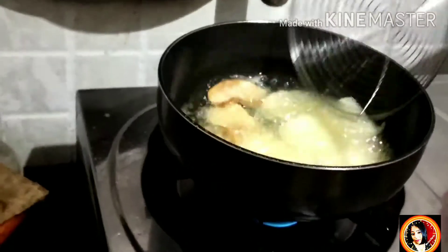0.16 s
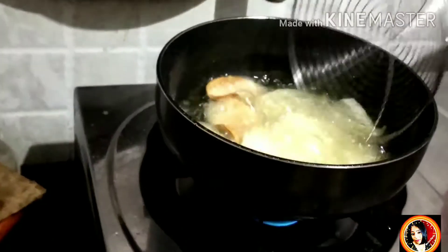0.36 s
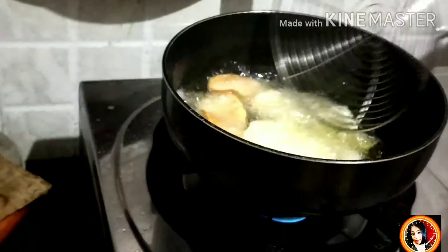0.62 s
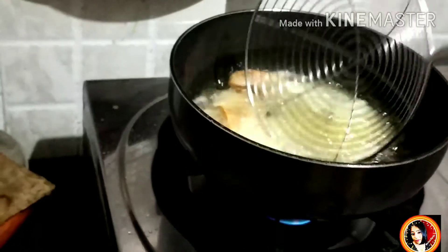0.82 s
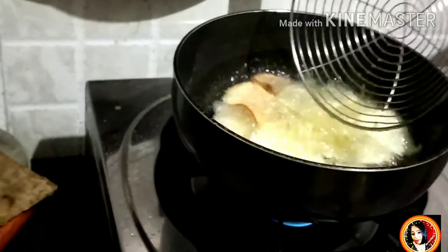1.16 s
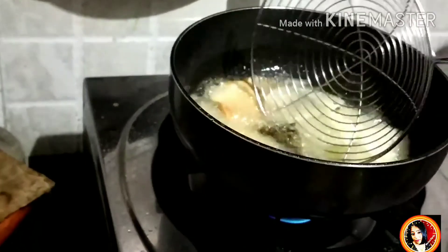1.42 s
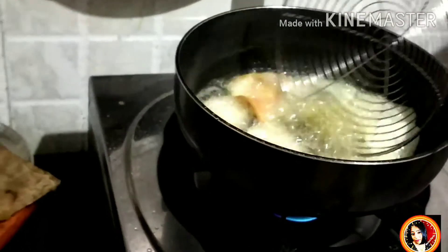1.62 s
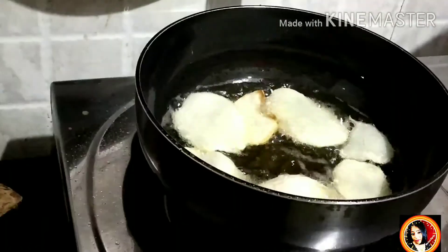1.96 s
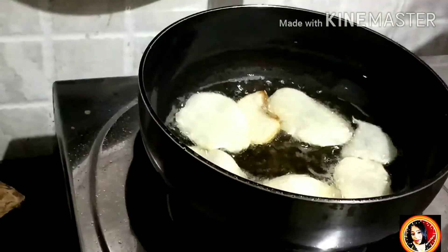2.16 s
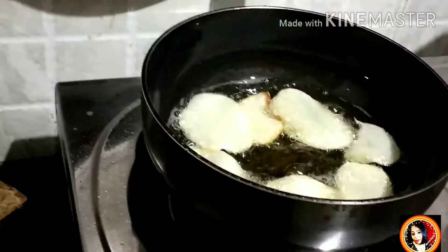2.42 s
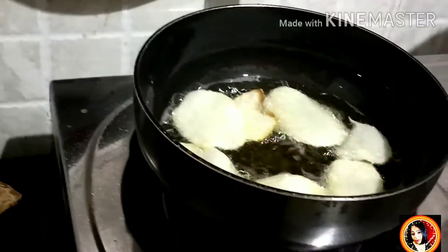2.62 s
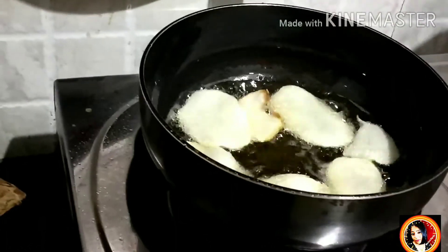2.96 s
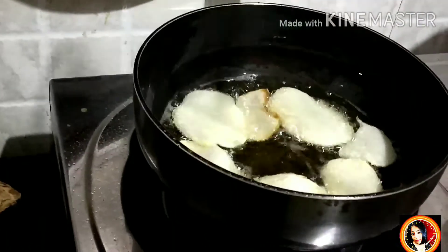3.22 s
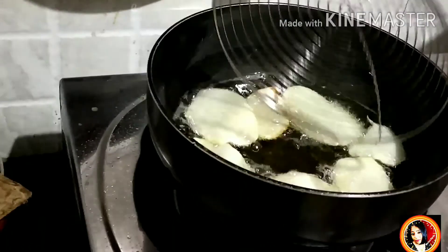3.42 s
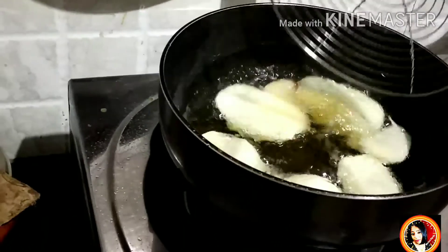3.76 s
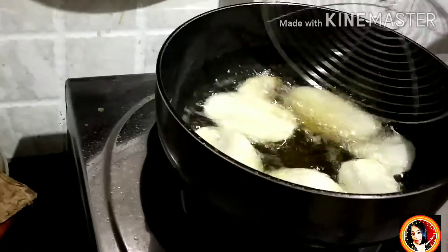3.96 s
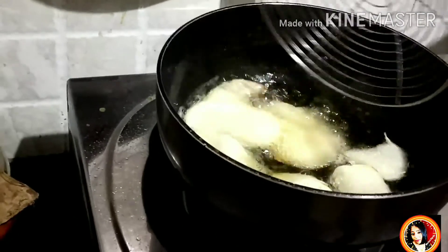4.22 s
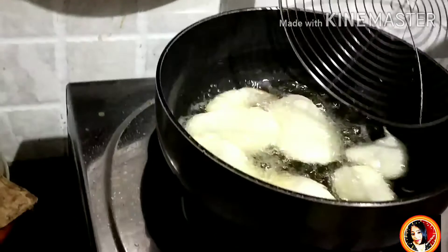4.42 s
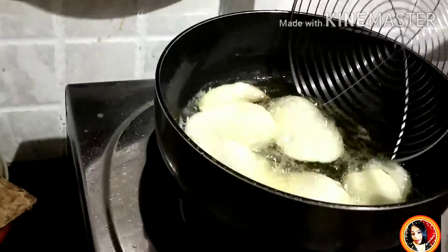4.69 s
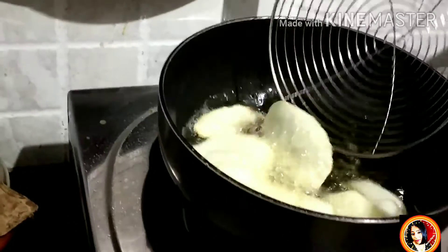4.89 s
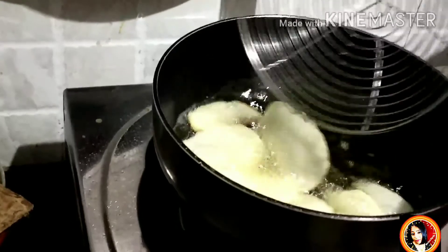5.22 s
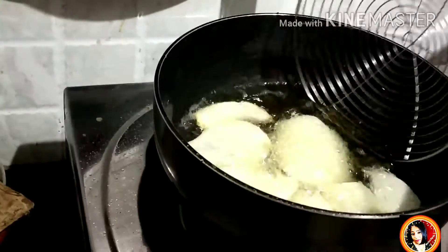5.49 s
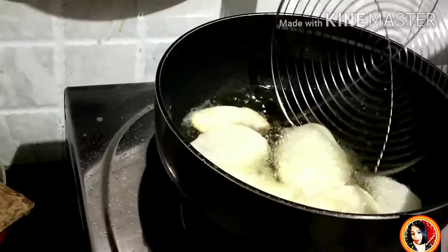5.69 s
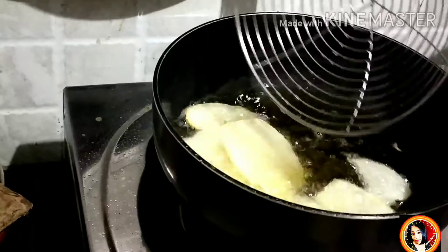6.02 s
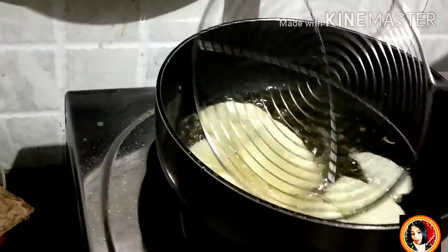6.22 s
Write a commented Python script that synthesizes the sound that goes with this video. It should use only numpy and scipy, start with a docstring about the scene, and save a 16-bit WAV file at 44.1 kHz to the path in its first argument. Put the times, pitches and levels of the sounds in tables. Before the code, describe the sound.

Potato slices fry furiously in hot oil, crackling and popping under a stirring wire skimmer, then the boil abruptly drops to a faint simmer.

```python
"""Potato slices frying in a deep pan

Wet slices fry in oil in a steel pan on a gas stove, close to a two-port microphone.
The oil boils hard while a wire skimmer stirs; at 1.89 s it drops abruptly to a simmer.
Fine fizz is flickering noise, bubbles are short damped tones, and large pops also sputter and whine.
The skimmer rubs, bumps, knocks and ticks; the burner's low rush and a hum lie underneath.
"""
import sys
import numpy as np
from scipy import signal
from scipy.fft import rfft, irfft
from scipy.io import wavfile
from scipy.ndimage import uniform_filter1d

SR = 44100
rng = np.random.default_rng(int(sys.argv[2]) if len(sys.argv) > 2 else 0)


def master_out(mix):
    """Clip the mix to full scale and print it as 16-bit PCM to the path in sys.argv[1]."""
    frames = np.transpose(np.atleast_2d(mix))
    ceiling = np.clip(frames, -1, 1)
    pcm = np.round(ceiling * 32767).astype(np.int16)
    wavfile.write(sys.argv[1], SR, pcm)


N = 280476  # length in samples


def oil():
    """Fine fizz, and ringing bubbles and short cracks that swell and sink in surges, as when stirred."""
    # course of the frying: start_s, fizz_db, bubbling_db (before dips and surges)
    course = [(0, -22.5, -22), (0.08, -25, -32), (0.16, -22, -27.5), (0.33, -22, -25.5), (0.45, -23, -25),
              (0.64, -21.5, -26), (0.82, -24, -25), (0.95, -21, -25.5), (1.03, -22, -27),
              (1.24, -21, -23.5), (1.36, -25, -24), (1.47, -21, -28), (1.56, -20, -20), (1.65, -20, -29.5),
              (1.74, -25.5, -24.5), (1.891, -21, -27.5), (1.893, -27.5, -52), (2.4, -26, -47),
              (3.9, -27, -40), (4.8, -27, -44.5), (5.4, -27, -39), (5.9, -28, -45.5), (6.36, -27, -36)]
    # brief dips in the level: start_s, length_s, change_db
    dips = [(0.231, 0.071, -6.5), (0.728, 0.065, -4.5), (1.655, 0.066, -7)]
    # tone of the fizz: pitch_hz, relative level_db
    fizz_tone = [(350, -6), (600, -8.5), (1320, -9), (1560, -1.5), (2720, -2.5), (3660, -0.5), (4680, 1.5),
                 (5820, -1), (11300, 2), (15500, -3.5)]
    # bubble sizes as a spectrum: pitch_hz, relative level_db
    bubble_tone = [(210, -46), (350, -51), (455, -12), (561, -7), (1160, -6.5), (1600, -2.5), (2690, 1),
                   (4800, -12), (6240, -11), (10600, -120)]

    fizz = hiss(fizz_tone, size=256, patchy_db=2.0, flicker_db=-0.83)
    boil = crackle(bubble_tone, np.geomspace(500, 4500, 22), per_s=1300, spread_db=3.0, cycles=18)
    boil += amp(-10) * hiss(bubble_tone, size=512, patchy_db=3.2, flicker_db=1.2)
    cracks = crackle(bubble_tone, np.geomspace(700, 3200, 8), per_s=500, spread_db=2.8, cycles=6)
    boil += amp(-4) * cracks

    change_db = np.zeros(N)
    for start_s, length_s, db in dips:
        add(change_db, start_s, db * signal.windows.tukey(round(length_s * SR), 0.4))
    surge = uniform_filter1d(uniform_filter1d(rng.standard_normal(N), size=900), size=900)
    change_db += 0.39 * evened(surge)  # fizz and bubbling surge together
    clump_db = 2 * evened(uniform_filter1d(rng.standard_normal(N), size=400))  # bubbles come in clumps
    fizz_gain = amp(follow(course, axis=1) + change_db)
    boil_gain = amp(follow(course, axis=2) + change_db + clump_db)
    return fizz_gain * fizz + boil_gain * boil


def pops():
    """Large bubbles snap and ring unevenly at two pitches, then sputter in clicks; some whine on."""
    # large bubbles bursting: start_s, level_db, pitch_hz, ring_cycles (cycles to die by 60 dB)
    bursts = [(0.0742, -13, 3500, 20), (0.1296, -10, 8720, 20), (0.1672, -13, 4300, 12),
              (0.2198, -12, 3400, 16), (0.3283, -6, 2880, 22), (0.339, -9, 1930, 14), (0.359, 0, 1600, 10),
              (0.4399, -1.5, 1680, 5), (0.496, -5.5, 2250, 13), (0.5027, -9, 900, 5), (0.5315, -6, 1490, 5),
              (0.5333, -8, 1980, 24), (0.5755, -10, 2600, 45), (0.6297, -10, 1910, 6),
              (0.6606, -6, 2420, 24), (0.6746, -14, 2000, 14), (0.7113, -14, 2400, 16),
              (0.7255, -10, 2500, 28), (0.7326, -9, 2900, 18), (0.7332, -12, 1300, 5),
              (0.802, -8.5, 1440, 14), (0.951, -7, 10200, 20), (1.0905, -5.5, 2100, 24),
              (1.1252, -10, 3200, 7), (1.1535, -12, 3300, 9), (1.1635, -11, 2780, 22),
              (1.2173, -12, 1300, 7), (1.2366, -11, 1520, 6), (1.2782, -12, 1510, 6),
              (1.3115, -12, 2550, 40),  (1.3532, -11, 9700, 18), (1.3813, -9, 1900, 5),
              (1.3965, -13, 1600, 7), (1.4228, -11, 2760, 14), (1.4484, -9, 2420, 36),
              (1.487, -2, 10300, 24), (1.5637, -9, 1250, 5), (1.5866, -10, 1550, 5), (1.6065, -7, 2160, 10),
              (1.7012, -16, 2500, 8), (1.7262, -10, 2600, 10), (1.7437, -4.5, 1800, 6),
              (1.7535, -16, 1600, 18), (1.7715, -14, 2800, 18), (1.7872, -11, 2100, 8),
              (1.8055, -14, 2200, 32), (1.8228, -12, 2100, 40), (2.5928, -21.5, 1800, 8),
              (2.5951, -13, 3100, 14), (2.6005, -20, 3050, 25), (2.6015, -21, 4300, 20),
              (2.6885, -16, 4000, 30), (2.691, -21, 3330, 90), (2.6945, -21, 3400, 40),
              (3.212, -16, 6600, 25), (3.381, -15, 3950, 34), (3.5652, -10, 2900, 5),
              (3.5662, -16, 2800, 60), (3.5685, -21, 5200, 25), (3.763, -23, 1850, 12),
              (3.832, -18, 2700, 26), (3.9722, -13, 2620, 36), (3.9762, -20, 2800, 40),
              (4.003, -25, 2560, 40), (4.635, -20, 4000, 30), (5.2623, -15.5, 2340, 26),
              (5.2625, -18, 1200, 6), (5.324, -21.5, 1700, 5), (5.402, -16, 2400, 16),
              (6.2465, -21, 2600, 12), (6.2655, -18, 2350, 18)]
    # steam whining out of a burst hollow: start_s, level_db, pitch_hz, end_pitch_hz, length_s
    whines = [(0.376, -29, 1634, 1744, 0.071), (0.799, -27, 1396, 1592, 0.054),
              (2.597, -34.5, 3000, 3000, 0.057)]
    out = np.zeros((2, N))
    for start_s, db, hz, cycles in bursts:
        add(out, start_s, amp(db) * one_pop(hz, cycles))
    for start_s, db, hz, end_hz, length_s in whines:
        turns = np.cumsum(np.linspace(hz, end_hz, round(length_s * SR))) / SR
        throb = 1 + 0.95 * evened(resonate(rng.standard_normal(len(turns)), 120.0, 90.0))
        tone = throb * signal.windows.tukey(len(turns), 0.4) * np.sin(2 * np.pi * turns)
        add(out, start_s, amp(db) * tone[None])
    return out * amp([[-1.6], [1.6]])  # leans to the right


def one_pop(hz, cycles):
    """A fluttering snap at two pitches, and its hollow sputtering on as clicks through a resonance."""
    sputter_db, sputter_cycles = -17.5, 260  # starting level; cycles to die by 60 dB
    t = np.arange(3000) / SR
    clicks = rng.standard_normal((2, len(t))) * (1 + (rng.random(len(t)) < 0.03) * 2.5)
    width = hz * np.clip(4.5 / cycles, 0.03, 0.4)  # a short crack spatters over many pitches
    sputter = evened(resonate(resonate(clicks, hz, width), hz, width))
    sputter = 0.46 * sputter[0] + 1.9 * sputter  # partly shared by both ports
    fade = amp(sputter_db - 60 * t * hz / sputter_cycles) * (1 - np.exp(-t / 0.0025))
    sound = min(cycles / 12, 1) * fade * sputter  # very short cracks sputter less

    snap = burst(hz, cycles, glide=0.003, rise=0.5 + 0.03 * cycles)
    snap += amp(-9) * burst(0.62 * hz, 6.0, glide=0.03, rise=0.5)
    flutter = evened(uniform_filter1d(rng.standard_normal(len(snap)), size=24))
    flutter *= np.minimum(t[:len(snap)] * hz / 8, 0.55)  # the ring grows uneven after its start
    add(sound, 0, (snap * (1 + flutter))[None])
    return sound


def skimmer():
    """Dragging shakes the pan's low modes with noise; bumps thud on them, knocks ring the wall."""
    # low modes of the pan: pitch_hz, width_hz (of each filter pass), relative level_db
    low_modes = [(264.7, 36.5, 10), (311.3, 43, 2.5)]
    # dull bumps on the pan: start_s, level_db, upper_share (0-1, of the upper low mode)
    bumps = [(0.468, -23.5, 0.45), (0.501, -23, 0.57), (0.611, -22.5, 0.45), (1.515, -23, 1),
             (1.535, -17.5, 0.37), (1.559, -22, 0), (1.592, -27, 0.05), (4.212, -26, 0.8),
             (4.226, -24.5, 0.28), (4.442, -27, 0.8), (4.465, -21, 0.23), (4.484, -27.5, 0.66),
             (4.52, -22, 0.4), (4.544, -23.5, 0.62), (5.341, -23.5, 0.3), (5.362, -27, 0.3),
             (5.399, -29, 0.3), (5.465, -23, 0.47), (5.501, -21, 0.68), (5.606, -26, 0.4),
             (5.918, -28, 0.57), (6.279, -26.5, 0.53), (6.3, -29, 0.12), (6.336, -29, 0.16)]
    # knocks and bounces on the pan wall: start_s, level_db
    knocks = [(0.885, -18.5), (1.4655, 2), (1.4742, -11), (1.4806, -1), (1.4865, -21), (1.5315, -9)]

    drag = rng.standard_normal((2, N)) * amp(-32)
    rub = sum(amp(db) * resonate(resonate(drag, hz, width), hz, width) for hz, width, db in low_modes)

    hits = np.zeros(N)
    lower, upper = (burst(hz, 36, glide=0, rise=0.88, size=6000) for hz, _, _ in low_modes)
    for start_s, db, share in np.array(bumps):
        add(hits, start_s, amp(db) * (lower + np.clip(share, 0, 1) * (upper - lower)))
    hits = hits * amp([[1.1], [-1.1]])  # bumps lean to the left

    ring = wall_ring()
    for start_s, db in knocks:
        add(hits, start_s, amp(db) * ring / abs(ring).max())
    return ports(*rub) + hits


def wall_ring():
    """A struck pan wall rings as several fading sines, reaching the right port a little later."""
    # modes of the wall: pitch_hz, relative level_db, fade_s (time to die by 60 dB), left_over_right_db
    modes = [(566, -1, 0.3, 6), (622, -8, 0.29, 3), (680, 12.5, 0.029, 2.5), (770, -6, 0.08, -2),
             (1050, -8, 0.044, -1), (1290, 0.5, 0.026, -1), (321, -5.5, 0.06, 4)]
    right_lag_s = 0.00022
    t = np.arange(9000) / SR
    late = np.maximum(t - np.array([[0], [right_lag_s]]), 0)
    side = np.array([[0.5], [-0.5]])
    ring = sum(amp(db + lean_db * side - 60 * t / fade_s) * -np.sin(2 * np.pi * hz * late)
               for hz, db, fade_s, lean_db in modes)
    return ring * (1 - np.exp(-t / 0.0018))


def wire_ticks():
    """The skimmer's wires tick: a short rattle of noise ringing in several bright bands."""
    # ticks: start_s, level_db, fade_s (time to die by 60 dB)
    ticks = [(5.479, -28, 0.079), (5.4918, -30, 0.06)]
    # bands of the noise: pitch_hz, width_hz (of each filter pass), relative level_db
    bands = [(7600, 170, 7), (9000, 250, 6.5), (10800, 300, 3), (14400, 300, 0.1), (12400, 400, -1),
             (3000, 3400, 3)]
    out, t = np.zeros((2, N)), np.arange(5000) / SR
    for start_s, db, fade_s in ticks:
        rattle = rng.standard_normal((2, len(t)))
        tone = sum(amp(band_db) * evened(resonate(resonate(rattle, hz, width), hz, width))
                   for hz, width, band_db in bands)
        shape = amp(db - 60 * t / fade_s) * (1 - np.exp(-t / 0.00082))
        add(out, start_s, shape * tone)
    return out


def kitchen():
    """The burner's low rush as noise, and a hum: a steady tone inside a narrow band of noise."""
    # tone of flame and room: pitch_hz, relative level_db
    rush_tone = [(35, -36), (60, -11), (162, 0.5), (195, -28), (291, -8), (338, -4), (727, -6),
                 (1200, -3.5), (1560, -20), (2640, -120)]
    # course of the hum: start_s, level_db (of its noise band, before the left-right lean)
    hum_course = [(0, -65), (1.8, -56), (2.0, -51), (3.0, -54), (3.3, -66), (4.4, -54.5), (6.36, -58)]
    hum_hz, hum_width_hz = 199, 24  # the width is that of each filter pass
    fuzz = resonate(resonate(rng.standard_normal(N), hum_hz, hum_width_hz), hum_hz, hum_width_hz)
    core = 1.8 * np.sin(2 * np.pi * hum_hz * np.arange(N) / SR)
    hum = amp(follow(hum_course, axis=1)) * (evened(fuzz) + core)
    rush = amp(-43.5) * hiss(rush_tone, size=2048, patchy_db=2.0, flicker_db=2.0)
    return rush + hum * amp([[1.2], [-1.2]])


def hiss(points, size, patchy_db, flicker_db):
    """Random short-time spectra with drifting patches and a flicker shared by all pitches."""
    frames, hz = 4 * N // size + 5, np.fft.rfftfreq(size, 1 / SR)
    a, b, c, d, patches = rng.standard_normal((frames, len(hz), 5)).T
    patches = uniform_filter1d(uniform_filter1d(patches, size=8, axis=0), size=12, axis=1)
    flicker = evened(uniform_filter1d(rng.standard_normal(frames), size=8))
    level_db = read(points, hz)[:, None] + patchy_db * evened(patches) + flicker_db * flicker
    spectra = np.array([a + 1j * b, c + 1j * d]) * amp(level_db)
    noise = signal.istft(spectra, nperseg=size, noverlap=3 * size // 4)[1][:, :N]
    return evened(ports(*noise))


def crackle(points, pitches, per_s, spread_db, cycles):
    """Many small bubbles at random moments, of random size and strength, each a short damped tone."""
    strength = amp(spread_db * np.minimum(rng.exponential(1, (2, N)), 5))
    strength = strength * (rng.random((2, N)) < per_s / SR)  # keep only the moments of a bubble
    kind, out = rng.integers(0, len(pitches), (2, N)), np.zeros((2, N))
    for k, hz in enumerate(pitches):
        grain = amp(read(points, hz)) * hz * burst(hz, cycles, glide=0.0058, rise=0.46)
        out += signal.oaconvolve(strength * (kind == k), grain[None], axes=1)[:, :N]
    return evened(ports(*out))


def burst(hz, cycles, glide, rise, size=700):
    """A damped sine: swells over about `rise` cycles, dies 60 dB in `cycles`, may glide up in pitch."""
    turns = hz * np.arange(size) / SR
    shape = (1 - np.exp(-(turns / rise) ** 2)) * amp(-60 * turns / cycles)
    return shape / shape.max() * np.sin(2 * np.pi * turns * (1 + glide * np.minimum(turns, 8)))


def resonate(x, hz, width):
    """A one-pole resonance with a gain of about 1 at its pitch."""
    r = np.exp(-np.pi * width / SR)
    return 2 * signal.lfilter([1 - r], [1, -r * np.exp(2j * np.pi * hz / SR)], x).real


def ports(a, b):
    """Two unrelated signals become the microphone pair: likeness and lean by pitch, and one lag."""
    # how alike the ports are: pitch_hz, likeness (-1 to 1)
    likeness = [(60, 0.66), (180, 0.95), (550, 0.55), (1650, 0.15), (4970, -0.16), (15000, 0.062)]
    # which port is louder: pitch_hz, left_over_right_db
    lean = [(60, 1.1), (180, 1.5), (550, 2.5), (1650, -3.5), (4970, -0.5), (15000, 3.5)]
    left_lag_s = 4e-5  # the left port hears this much later
    hz = np.fft.rfftfreq(N, 1 / SR)
    same, a, b = np.clip(read(likeness, hz), -1, 1), rfft(a), rfft(b)
    right = same * a * np.exp(2j * np.pi * hz * left_lag_s) + np.sqrt(1 - same ** 2) * b
    return irfft(np.array([a, right]) * amp(np.outer([0.5, -0.5], read(lean, hz))), N)


def amp(db):
    """Decibels to a plain factor."""
    return 10 ** (np.asarray(db) / 20)


def evened(x):
    """Scale to an average (RMS) level of 1."""
    return x / np.sqrt(np.mean(x ** 2) + 1e-20)


def read(points, hz):
    """Read a curve at any pitch, along a logarithmic pitch scale."""
    f, value = np.transpose(points)
    return np.interp(np.log(hz + 1), np.log(f + 1), value)


def follow(rows, axis):
    """One column of a timed table at every sample."""
    rows = np.asarray(rows)
    return np.interp(np.arange(N) / SR, rows[:, 0], rows[:, axis])


def add(mix, start_s, sound):
    """Add a sound into the mix at its start time, cut off at the end."""
    part = mix[..., round(start_s * SR):][..., :sound.shape[-1]]
    part += sound[..., :part.shape[-1]]


def scene():
    """All sources together."""
    return oil() + pops() + skimmer() + wire_ticks() + kitchen()


def record(dry):
    """The microphone drops the bass, gain control ducks after loud sounds, then the top is cut off."""
    pitch = (np.fft.rfftfreq(N, 1 / SR) + 1) / 186  # 1 at the bass corner
    steep_cut = 1 / np.sqrt(1 + pitch ** -18)
    leftover_bass = amp(-11) * np.minimum(pitch, 1) ** 1.6
    thin = irfft(rfft(dry) * np.maximum(steep_cut, leftover_bass), N)

    power_db = 10 * np.log10(abs(uniform_filter1d((thin ** 2).mean(0), size=88)) + 1e-12)
    fall = np.arange(N) * 65.0 / SR  # the held peak falls 65 dB a second
    held_db = np.maximum.accumulate(power_db + fall) - fall
    over_db = np.maximum(held_db + 13.5, 0)  # excess above -13.5 dB
    cut_db = 0.6 * signal.lfilter([0.012], [1, -0.988], over_db)  # the gain follows smoothly
    ducked = thin / amp(cut_db)

    top_cut = signal.firwin(511, 15750, window=("kaiser", 9), fs=SR)  # edge in Hz
    return signal.oaconvolve(ducked, top_cut[None], "same")


dry = scene()
out = record(dry)
master_out(out)
```